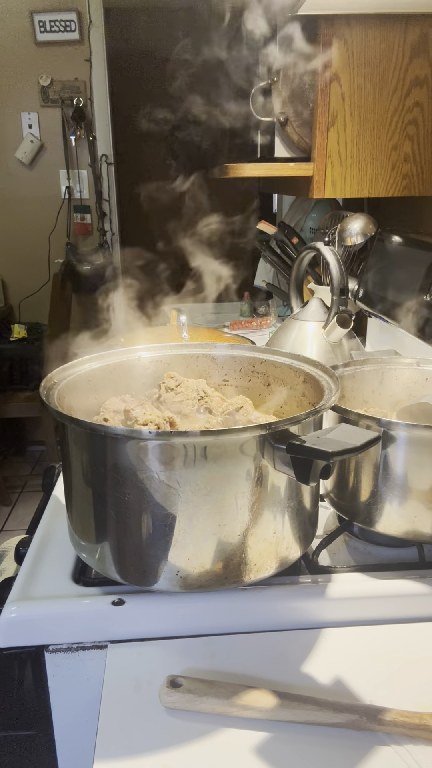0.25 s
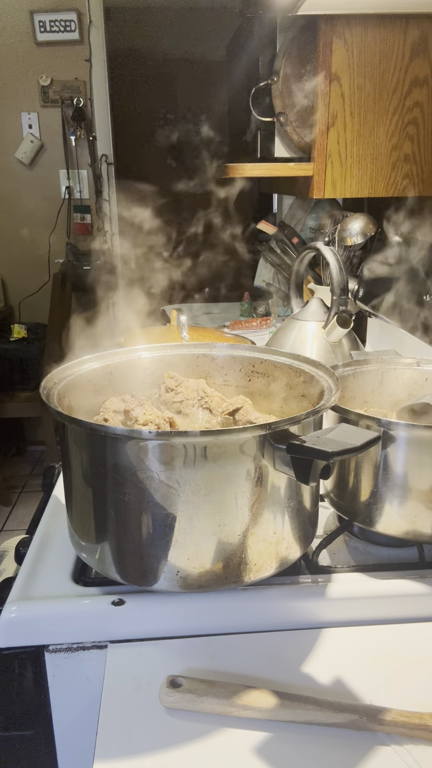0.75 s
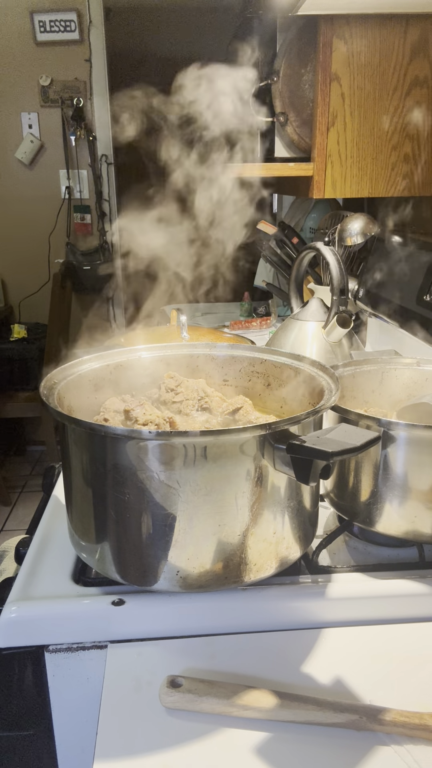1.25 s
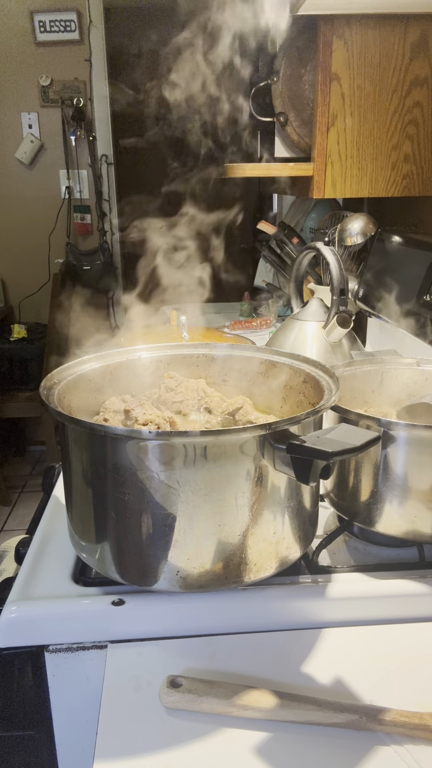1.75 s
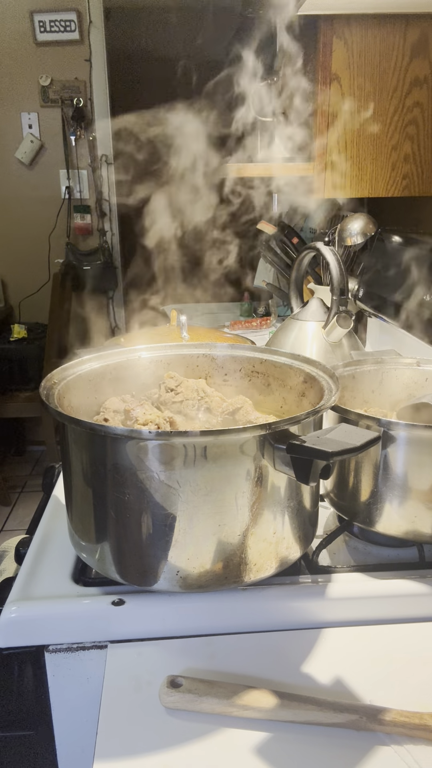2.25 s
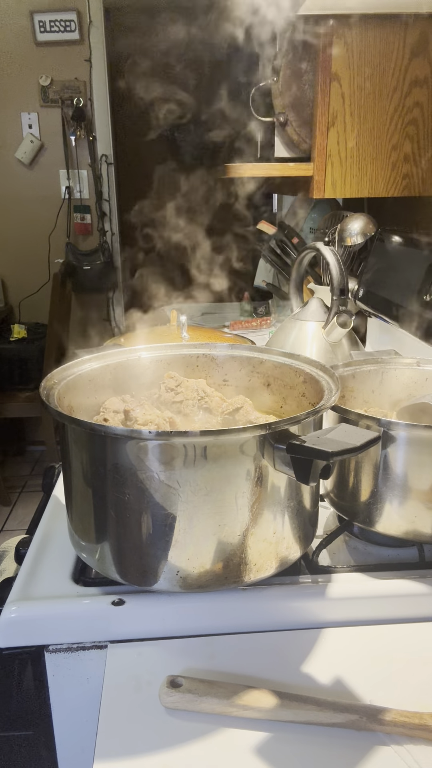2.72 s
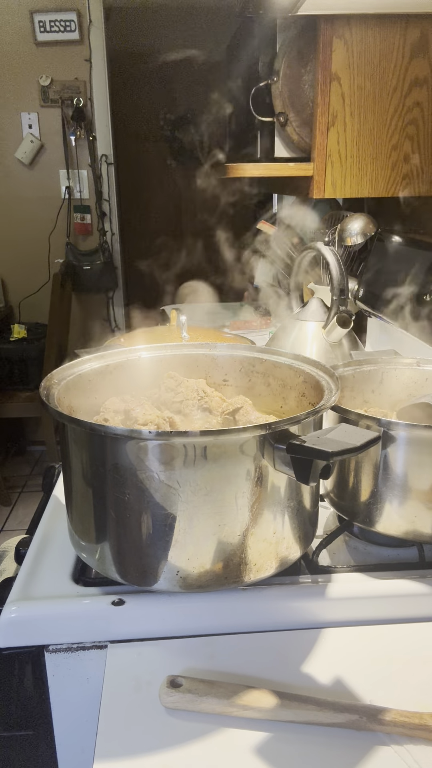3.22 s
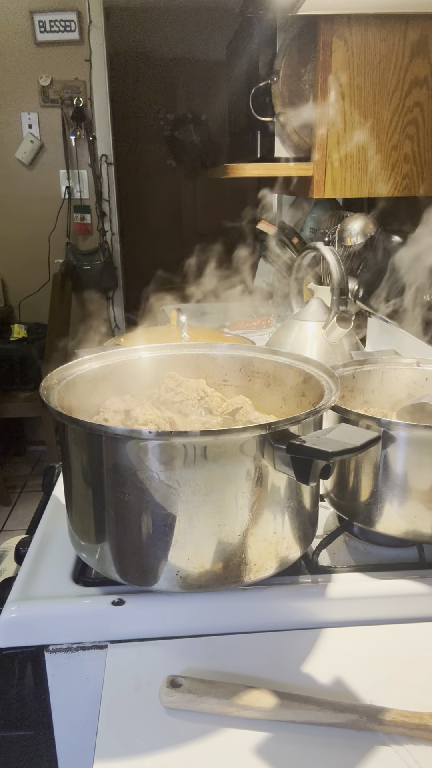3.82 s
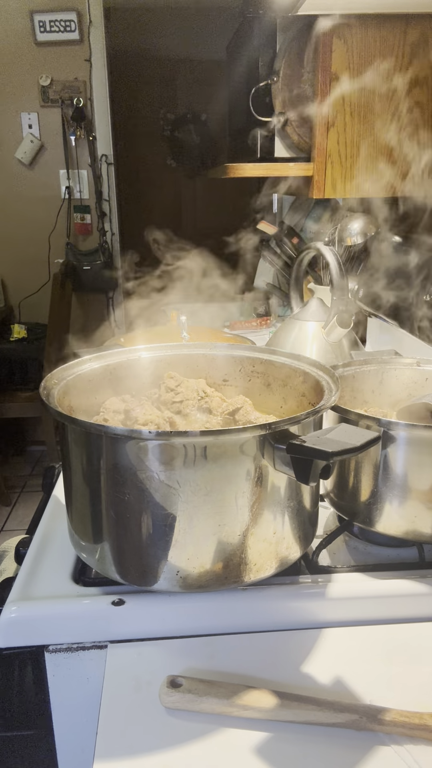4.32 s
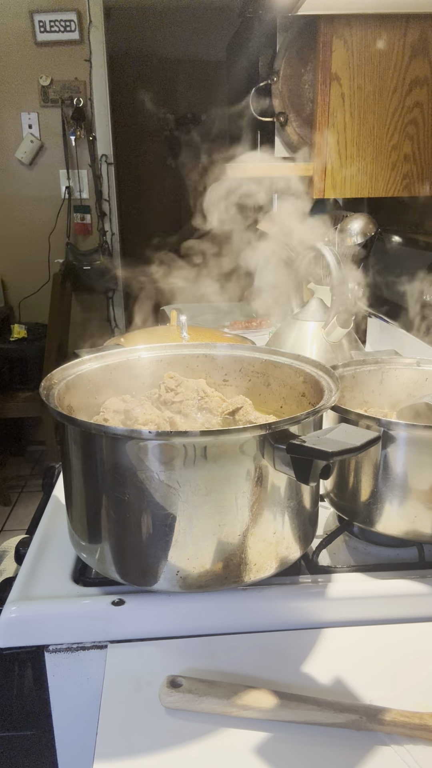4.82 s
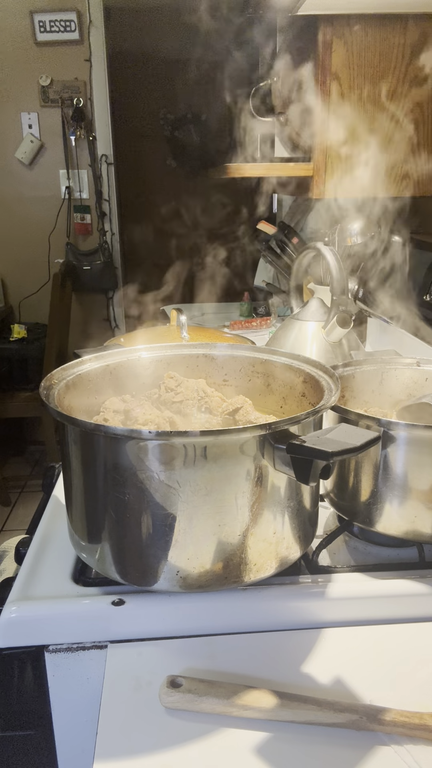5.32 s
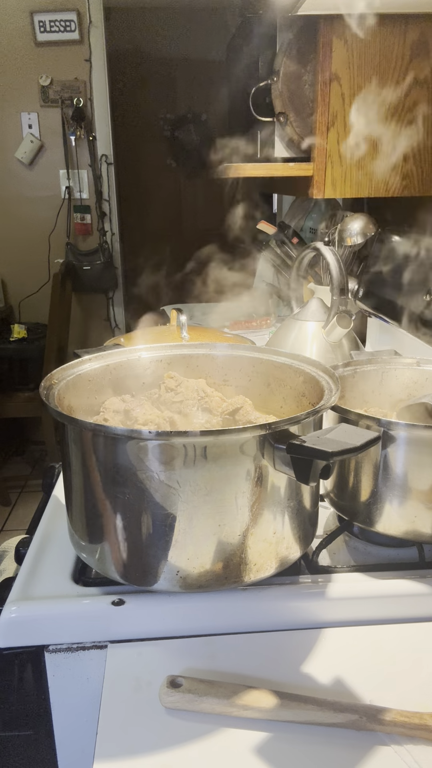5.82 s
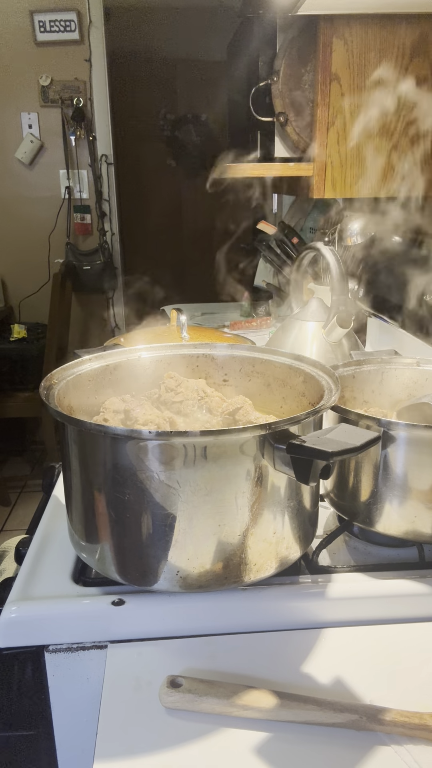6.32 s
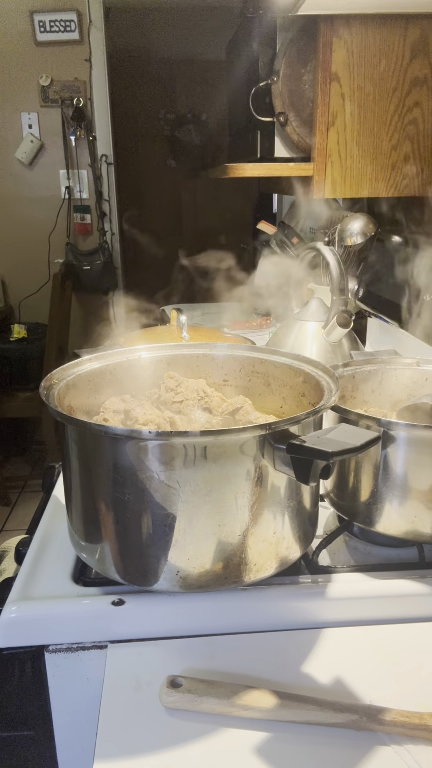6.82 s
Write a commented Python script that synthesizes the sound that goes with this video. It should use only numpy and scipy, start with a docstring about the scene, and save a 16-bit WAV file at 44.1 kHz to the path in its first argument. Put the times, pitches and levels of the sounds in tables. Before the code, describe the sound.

Steady gurgling boil in metal pots with soft hiss and hum; someone shuffles, knocks wood once, then makes two dull thuds near the end.

```python
"""Steam bubbles gurgle, spit and knock on the walls of large steel pots boiling on a home gas stove.
Knocks are struck wall modes, bubbles are short rising tones, and spits are brief puffs of noise.
Under them lie burner roar and hiss (drifting noise) and an appliance hum (steady sines).
Someone nearby shuffles (rubbing noise), knocks wood once and makes two dull thuds among fainter ones
(struck modes). Two close microphone ports share the direct sound and differ in the diffuse sound."""
import sys
import numpy as np
from scipy import signal
from scipy.fft import rfft, irfft
from scipy.io import wavfile
from scipy.ndimage import uniform_filter1d

SR = 44100
rng = np.random.default_rng(int(sys.argv[2]) if len(sys.argv) > 2 else 0)


def dump(signal):
    """Clip the signal to [-1, 1] and save it as 16-bit WAV at the path in sys.argv[1]."""
    limited = np.clip(np.atleast_2d(signal).T, -1, 1)
    pcm = np.round(limited * 32767).astype(np.int16)
    wavfile.write(sys.argv[1], SR, pcm)


N = 311346  # length in samples

# Modes of the steel pot wall. Each row: frequency in Hz, relative level in dB, 60 dB decay time in s.
POT_MODES = [(581, 3.5, 0.027), (653, 1, 0.017), (780, -4, 0.03), (1010, 0, 0.02), (1120, -1.5, 0.018),
             (1370, -2, 0.017), (1800, -3.5, 0.018), (2050, -3.5, 0.02), (2374, -12, 0.02),
             (2555, -8, 0.021)]
# Loudest bubble collapses against the wall. Each row: start in s, level in dB, favoured pitch in Hz.
POT_KNOCKS = [(0.064, -42, 1020), (0.184, -42, 1500), (0.196, -38, 800), (0.451, -46, 1020),
              (0.548, -41, 1010), (0.686, -42.5, 945), (0.91, -39, 650), (1.031, -44, 1050),
              (1.33, -40.5, 650), (1.348, -39, 1860), (1.431, -44, 990), (1.445, -41.5, 1100),
              (1.459, -44, 1790), (1.512, -43, 2410), (1.612, -44.5, 1200), (1.69, -40, 705),
              (1.741, -45, 650), (1.757, -40, 2080), (1.767, -39.5, 1350), (1.809, -46, 1030),
              (1.826, -40, 1800), (1.991, -38, 1070), (2.03, -51, 2000), (2.076, -43, 620),
              (2.106, -45, 1360), (2.28, -47, 1360), (2.345, -42.5, 1340), (2.379, -44, 1010),
              (2.444, -40.5, 980), (2.526, -40.5, 2500), (2.659, -44.5, 990), (2.76, -45.5, 1330),
              (2.946, -44, 1000), (2.967, -41, 1340), (3.143, -39.5, 1320), (3.25, -41, 890),
              (3.365, -36, 1100), (3.399, -41.5, 1790), (3.415, -44, 2300), (3.535, -35.5, 1170),
              (3.572, -50, 1030), (3.762, -46, 1400), (3.844, -43, 2100), (4.048, -55, 1050),
              (4.136, -42.5, 1370), (4.349, -46, 1030), (4.384, -40, 970), (4.419, -41, 1050),
              (4.622, -41.5, 810), (4.71, -41.5, 1010), (5.024, -34.5, 1200), (5.17, -43.5, 1000),
              (5.268, -33.5, 1390), (5.523, -45, 1130), (5.549, -43, 780), (5.578, -44, 1130),
              (5.738, -43, 1120), (6.537, -43, 780), (6.631, -41, 762), (6.995, -32, 770),
              (7.028, -37, 780)]
# Strength of the boil about its usual level. Each row: time in s, strength in dB.
BOIL_STRENGTH = [(0.0, -2.5), (0.15, 2), (0.3, 1.5), (3.5, 2), (6.07, 2.2), (6.29, -7), (6.6, 7)]
# Dry wide ticks. Each row: start in s, level in dB.
LOUD_TICKS = [(0.3616, -47), (0.767, -39), (0.909, -37), (4.6165, -36), (5.5488, -55), (5.6346, -35),
              (5.994, -32), (6.1925, -36), (6.2283, -22.5), (6.316, -34.5), (6.6833, -26), (6.8578, -40),
              (7.0125, -34)]
# Thuds, each a quick roll of blows. Each row: start in s, roll length in s, level in dB,
# 60 dB decay time of the clatter in s, brightness in dB per octave, boom level in dB.
THUD_ROLLS = [(6.229, .023, -19, 0.075, 1, -14.5), (6.271, 0.04, -32.5, 0.19, 0, -34),
              (6.677, 0.032, -22, 0.07, -2, -27), (6.684, .02, -29, 0.072, 15, -50),
              (6.725, .045, -32, 0.067, 0, -32), (6.828, 0.0078, -41.5, 0.06, 0.5, -50),
              (6.912, .03, -42, 0.35, 9, -45), (6.994, .035, -43, 0.1, 7.5, -47.5)]
# Modes that the thuds ring. Each row: frequency in Hz, relative level in dB, 60 dB decay time in s.
BOARD_MODES = [(141, -1.5, 0.052), (256, -2, 0.073), (321, -0.5, 0.092), (385, -4, 0.057),
               (486, -7.5, 0.031), (562, -5, 0.025), (668, -2.5, 0.044), (772, -2.5, 0.025),
               (903, -7.5, 0.029), (1073, -4, 0.023), (1200, 0.5, 0.014), (1790, -15.5, 0.049),
               (1960, -18.5, 0.041), (2224, -23, 0.021)]
# The wooden knock. One row: start in s, level in dB, rattle share 0-1, 60 dB rattle decay time in s.
WOOD_KNOCK = (4.854, -15.5, 0.02, 0.32)
# Modes of the piece of wood. Each row: frequency in Hz, relative level in dB, 60 dB decay time in s.
WOOD_MODES = [(301, -5.5, 0.052), (381, -4.5, 0.084), (425, -6.5, 0.13), (550, -0.5, 0.044),
              (650, 8, 0.041), (770, -1, 0.024), (963, -1, 0.032), (1180, -0.5, 0.024), (1647, 2.5, 0.013),
              (2140, -4.5, 0.018), (2500, -8, 0.02)]
# Shuffling strokes. Each row: peak in s, swell in s, hold in s, fade in s, scratch level in dB,
# body level relative to the scratch in dB, airy top relative to the scratch in dB, squeak in Hz.
STROKES = [(0.365, 0.024, 0.034, 0.14, -52.5, 7.5, -5, 3050),
           (4.738, 0.15, .01, 0.061, -64.5, 10.5, -21, 4400),
           (4.835, 0.14, 0.017, 0.15, -50.5, 6, -3, 4600), (5.549, 0.0081, .005, 0.15, -59, 7, -1, 3920),
           (6.194, 0.05, 0.011, 0.041, -60, -6, 12, 3600), (6.231, 0.013, 0.01, 0.1, -48, 15, 1.5, 3450),
           (6.33, 0.35, 0.042, 0.15, -60, 7, 0.5, 3700), (6.688, 0.052, 0.024, 0.14, -49, 12.5, 0.5, 3900),
           (6.83, 0.14, .02, 0.12, -63.5, 9, 9, 4100), (6.915, 0.1, 0.024, 0.21, -56.5, 8, 5, 3600),
           (7.0, 0.1, 0.056, 0.33, -62, 6.5, 8, 4020)]
# Spectra of rubbing: scratch, duller body, airy top. Each row: frequency in Hz, relative level in dB.
SCRATCH_SPECTRUM = [(2400, -23), (3300, 3.5), (4000, -3), (4900, 1.5), (6200, 1), (9000, -15), (12000, -41)]
BODY_SPECTRUM = [(300, 1), (600, 6), (1100, -0.5), (1550, -6.5), (2050, 4), (2400, 0.5), (2700, -1.5),
                 (3300, -11), (5000, -39)]
AIR_SPECTRUM = [(6000, -43), (9000, 0.5), (13000, 8.5), (16000, 2)]
# Squeak band of a stroke. One row: level relative to the scratch in dB, width in Hz.
SQUEAK_BAND = (-3, 1200)
# Burner roar with the kitchen's low resonances. Each row: frequency in Hz, level in dB per Hz.
ROAR_SPECTRUM = [(18, -105), (50, -71.5), (100, -69), (140, -72), (182, -90), (230, -79), (400, -77),
                 (510, -86), (640, -85.5), (800, -90.5), (1500, -97), (2050, -95.5), (2300, -97.5),
                 (2750, -96.5), (3100, -105), (6000, -115)]
# Burner hiss through the microphone's treble peak. Each row: frequency in Hz, level in dB per Hz.
HISS_SPECTRUM = [(1500, -113), (3500, -104), (6200, -102.5), (8000, -105), (9700, -107.5), (10800, -104.5),
                 (12200, -98.5), (15800, -101.5)]
# Appliance hum: motor, its slower beat partner, mains buzz. Each row: frequency in Hz, rms level in dB.
HUM_TONES = [(59.17, -46.5), (55.85, -58.5), (119.99, -51.5)]
# Weak bass of the microphone and a dead spot of the room, for sounds near the stove.
# Each row: frequency in Hz, gain in dB.
BASS_RESPONSE = [(20, -50), (75, -1), (150, 1.5), (185, -8), (230, 0.5)]
# The pair of ports. Each row: frequency in Hz, share of power arriving directly 0-1,
# left minus right level in dB.
PORT_PAIR = [(110, .9996, 0), (150, .993, 0), (220, .96, .8), (400, .93, -.5), (700, .45, -1.5),
             (1300, .5, -2.5), (2000, .68, -1.5), (3000, .35, .3), (4700, .3, .8), (6200, .55, 1),
             (7300, .99, 0), (9200, .99, 0), (10200, .75, 0), (12600, .98, 0), (13700, .98, 0),
             (15800, .8, 0)]
# The ports turn out of step in the treble. Each row: frequency in Hz, lead of the right port in radians.
PORT_LEAD = [(0, 0), (4000, .15), (5500, 1.5), (7300, 3.1), (9200, 3.2), (10200, 4.3), (12600, 6.2),
             (13700, 6.35), (15800, 7.9)]

SPOT_DETUNE, BLOW_DETUNE = 0.03, 0.043  # spread of mode pitch, as a share, from contact to contact
KNOCK_CONTACT_S, KNOCK_FLURRY_S = .0032, 0.0061
KNOCK_NARROW_DB, KNOCK_WIDE_DB = 26, 14  # loss per octave off the favoured pitch, and the largest loss
PATTER_DB, PATTER_PER_S, PATTER_SPREAD_DB = -60.5, 450, 3.5
PATTER_LOW_HZ, PATTER_HIGH_HZ = 573, 2700
CHURN_DB, CHURN_S = 4, .03  # depth and smoothing time of the clumps of small bubbles
BLOWS = 4  # blows in a roll
ROLL_ARCH_DB, ROLL_FADE_DB = 6.5, -2.5  # rise at mid-roll, change from first blow to last
ROLL_DRAG = 1.1  # the gaps between blows widen by this power
ROLL_DULLING_DB = -6  # change of tilt per octave, from the first blow of a roll to the last
BOOM_HZ, BOOM_S = 115.5, 0.011
STROKE_RANGE_DB = 30  # rise over the swell and fall over the fade
LUMPS_DB = 3.5  # slower catches that roughen the body of a stroke
EDGE_HZ = 15800


def gain_of(db):
    """Level law: decibels to amplitude."""
    return 10 ** (np.asarray(db) / 20)


def evened(x):
    """Normalisation to unit rms."""
    return x / np.sqrt(np.mean(x ** 2) + 1e-20)


def read(points, hz, index=1):
    """Interpolation of a table column on a logarithmic frequency axis."""
    points = np.transpose(points)
    return np.interp(np.log(hz + 1), np.log(points[0] + 1), points[index])


def coloured(x, points):
    """Linear filtering: each frequency is scaled by a (Hz, dB) spectrum."""
    size = x.shape[-1]
    return irfft(rfft(x) * gain_of(read(points, np.fft.rfftfreq(size, 1 / SR))), size)


def add(mix, s, sound):
    """Superposition of a sound on the mix, from a time in seconds."""
    part = mix[round(s * SR):][:len(sound)]
    part += sound[:len(part)]


def unequal_hits(per_s, spread_db, limit):
    """Poisson-like arrivals: sparse single-sample hits of very unequal, bounded sizes."""
    size = gain_of(spread_db * np.minimum(rng.exponential(1, N), limit))
    return size * (rng.random(N) < per_s / SR)


def strayed(modes, share, luck):
    """Dependence on the contact: the same modes, each a little off its pitch."""
    return [(hz * (1 + share * r), db, t60) for (hz, db, t60), r in zip(modes, luck)]


def ring(modes, contact_s, extra_db=0., size=8000):
    """Modal response to a soft pulse, peak 1: decaying sines, neighbouring modes swinging oppositely."""
    t = np.arange(size) / SR
    hz, db, t60 = np.transpose(modes)[:, :, None]
    sign = (-1.) ** np.arange(len(modes))[:, None]
    level = sign * gain_of(db + extra_db - 60 * t / t60)
    x = (level * np.sin(2 * np.pi * hz * t)).sum(0)
    x = x * (1 - np.exp(-t / contact_s))  # the contact softens the onset
    return x / abs(x).max()


def resonate(x, hz, width_hz):
    """Band resonance by heterodyning: shifts the curve hz down to zero, smooths, and shifts back."""
    turn = np.exp(2j * np.pi * np.cumsum(hz) / SR)
    r = np.exp(-np.pi * width_hz / SR)
    smooth = signal.lfilter([1 - r], [1, -r], x / turn)
    smooth = signal.lfilter([1 - r], [1, -r], smooth)
    return evened((turn * smooth).real)


def pot_knocks():
    """Modal excitation: collapsing bubbles ring the wall in flurries that favour modes near their pitch."""
    out, hz, t = np.zeros(N), np.array(POT_MODES)[:, :1], np.arange(700) / SR
    lucks = rng.standard_normal((len(POT_KNOCKS), len(t) + len(POT_MODES)))
    for (s, db, pitch_hz), luck in zip(POT_KNOCKS, lucks):
        where_db = 1.2 * luck[len(t):, None]  # every spot on the wall drives the modes differently
        loss_db = np.minimum(KNOCK_NARROW_DB * abs(np.log2(hz / pitch_hz)), KNOCK_WIDE_DB)
        flurry = (t == 0) + 0.14 * luck[:len(t)] * np.exp(-t / KNOCK_FLURRY_S)
        modes = strayed(POT_MODES, SPOT_DETUNE, luck[:len(t):7])
        wall = ring(modes, KNOCK_CONTACT_S, where_db - loss_db, size=3000)
        knock = signal.oaconvolve(flurry, wall)
        add(out, s, gain_of(db) * knock / abs(knock).max())
    return out


def pot_patter(churn):
    """Modal excitation by many small collapses, each on one of 24 spots with its own favoured pitch."""
    hz = np.array(POT_MODES)[:, :1]
    small = unequal_hits(PATTER_PER_S, PATTER_SPREAD_DB, 4)
    spots = np.geomspace(PATTER_LOW_HZ, PATTER_HIGH_HZ, 24)
    which, luck = rng.integers(0, len(spots), N), rng.standard_normal((len(spots), len(POT_MODES)))
    patter = np.zeros(N)
    for k, pitch_hz in enumerate(spots):
        modes = strayed(POT_MODES, SPOT_DETUNE, luck[k])
        wall = ring(modes, 0.00083, -12 * abs(np.log2(hz / pitch_hz)), size=3000)
        patter += signal.oaconvolve(small * (which == k), wall)[:N]
    return gain_of(PATTER_DB) * evened(patter * churn)


def grains(per_s, low_hz, high_hz, cycles, glide, spread_db, count=24):
    """Bubble resonance: short rising tones, each pitch with its own sparse train of unequal sizes."""
    boil = gain_of(np.interp(np.arange(N) / SR, *np.transpose(BOIL_STRENGTH)))
    size = unequal_hits(per_s, spread_db, 5) * boil
    which, out = rng.integers(0, count, N), np.zeros(N)
    for k, hz in enumerate(np.geomspace(low_hz, high_hz, count)):
        u = np.arange(int(3 * cycles * SR / hz)) * hz / SR / cycles
        envelope = (1 - np.exp(-8 * u)) * np.exp(-2.5 * u)
        bubble = envelope * np.sin(2 * np.pi * cycles * (u + glide * u ** 2))
        out += signal.oaconvolve(size * (which == k), bubble)[:N]
    return evened(out)


def broth(churn):
    """Bubble resonance at the surface: big gurgles lie low, smaller bubbles reach higher."""
    gurgle = gain_of(-63) * grains(180, 298, 780, 1.56, 0.053, 1.8)
    bubbles = gain_of(-65) * grains(400, 605, 2880, 4.5, 0.1, 3.4)
    return (gurgle + bubbles) * churn


def ticks():
    """Impulsive noise: brief wide puffs, the loud ones and a faint spitting from the pot rims."""
    out, t = np.zeros(N), np.arange(400) / SR
    for (s, db), noise in zip(LOUD_TICKS, rng.standard_normal((len(LOUD_TICKS), 400))):
        add(out, s, gain_of(db - 60 * t / 0.02) * noise)
    spits = gain_of(-52.0) * unequal_hits(35, 4.17, 4)
    decay = np.exp(-1 / (0.00063 * SR))
    out += signal.lfilter([1], [1, -decay], spits) * rng.standard_normal(N)
    return coloured(out, [(800, -0.5), (3000, -3.5), (9000, -11.0), (13000, -5)])  # (Hz, dB)


def thuds():
    """Modal excitation: each blow of a roll and the clatter that follows it ring the boards."""
    out, t, hz = np.zeros(N), np.arange(SR // 4) / SR, np.array(BOARD_MODES)[:, :1]
    luck = rng.standard_normal((len(THUD_ROLLS), BLOWS, len(t)))
    for (s, roll_s, db, t60, tilt_db, boom_db), noises in zip(THUD_ROLLS, luck):
        # the floor gives way once at the end of each roll
        swell = np.exp(-((t - roll_s) / BOOM_S) ** 2) * np.minimum(t / roll_s, 1)
        add(out, s, gain_of(boom_db) * swell * np.sin(2 * np.pi * BOOM_HZ * t))
        for u, noise in zip(np.linspace(0, 1, BLOWS), noises):
            tilt = (tilt_db + ROLL_DULLING_DB * (u - .5)) * np.log2(hz / 300)
            boards = ring(strayed(BOARD_MODES, BLOW_DETUNE, noise[::-1]), 0.00058, tilt)
            drive = (t == 0) + 0.1 * noise * gain_of(-60 * t / t60)
            blow = signal.oaconvolve(drive, boards) / np.linalg.norm(drive)
            blow_db = db + ROLL_ARCH_DB * np.sin(np.pi * u) + ROLL_FADE_DB * u
            add(out, s + u ** ROLL_DRAG * roll_s, gain_of(blow_db) * blow)
    return out


def wood_knock():
    """Modal excitation: one blow rings the wood, and a decaying noise drive lets it rattle on."""
    out, t = np.zeros(N), np.arange(SR // 4) / SR
    s, db, share, t60 = WOOD_KNOCK
    drive = (t == 0) + share * rng.standard_normal(len(t)) * gain_of(-60 * t / t60)
    add(out, s, gain_of(db) * signal.oaconvolve(drive, ring(WOOD_MODES, 0.0016)))
    return out


def shuffles():
    """Friction noise: grainy scratch, body, airy top and squeak, as each stroke swells, holds and fades."""
    grit = gain_of(2.5 * evened(uniform_filter1d(rng.standard_normal(N), 150)))
    noise = rng.standard_normal((4, N)) * grit
    scratch = evened(coloured(noise[0], SCRATCH_SPECTRUM))
    body = evened(coloured(noise[1], BODY_SPECTRUM))
    air = evened(coloured(noise[2], AIR_SPECTRUM))
    lumps = evened(uniform_filter1d(rng.standard_normal(N), 600))
    body = evened(body * gain_of(LUMPS_DB * lumps))
    squeak_db, squeak_width_hz = SQUEAK_BAND
    out = np.zeros(N)
    for peak_s, swell_s, hold_s, fade_s, level_db, body_db, air_db, squeak_hz in STROKES:
        end = min(round((peak_s + hold_s + fade_s) * SR), N)
        at = np.arange(round((peak_s - swell_s) * SR), end)
        t = at / SR - peak_s
        away = np.maximum(np.maximum(-t / swell_s, (t - hold_s) / fade_s), 0)
        stroke = gain_of(level_db - STROKE_RANGE_DB * away)
        squeak = resonate(noise[3, at], np.full(len(at), squeak_hz), squeak_width_hz)
        rub = scratch[at] + gain_of(body_db) * body[at] + gain_of(air_db) * air[at]
        out[at] += stroke * (rub + gain_of(squeak_db) * squeak)
    return out


def burner():
    """Turbulent noise: direct, left-diffuse and right-diffuse fields with shared patches and flutter."""
    frames, hz = N // 256 + 5, np.fft.rfftfreq(1024, 1 / SR)
    z = rng.standard_normal((frames, 513, 7)).T
    patches = evened(uniform_filter1d(uniform_filter1d(z[6], 14, 0), 12, 1))
    flutter = evened(uniform_filter1d(rng.standard_normal(frames), 5))
    boil = np.interp(np.arange(frames) * 256 / SR, *np.transpose(BOIL_STRENGTH))
    # the flame's hiss flutters as one, its roar drifts in patches
    treble = np.clip(hz / 3000, 0, 1)[:, None]
    patch_depth = 1.4 * (1.5 - 1.45 * treble) * np.clip(hz / 350, .3, 1)[:, None]
    field = gain_of(patch_depth * patches + 1.7 * flutter * treble + .5 * boil)
    spectra = (z[:3] + 1j * z[3:6]) * field
    white = evened(signal.istft(spectra, nperseg=1024, noverlap=768)[1][:, :N])
    # unit rms spread over SR / 2, so the spectra read as dB per Hz
    return (coloured(white, ROAR_SPECTRUM) + coloured(white, HISS_SPECTRUM)) * np.sqrt(SR / 2)


def hum():
    """Beating of steady tones: the close pair beats about three times a second."""
    t, out = np.arange(N) / SR, np.zeros(N)
    for hz, db in HUM_TONES:
        out += np.sqrt(2) * gain_of(db) * np.sin(2 * np.pi * (hz * t + rng.random()))
    return out


def kitchen(x, t60s):
    """Diffuse reverberation: spectra of x through two unrelated even tails of sparse taps; t60s is (Hz, s)."""
    taps = np.zeros((2, SR // 2))
    at = np.arange(60, SR // 2 - 20, 20) + rng.integers(0, 20, (2, (SR // 2 - 61) // 20))
    np.put_along_axis(taps, at, rng.choice([-1., 1.], at.shape), 1)
    hz, t, z = signal.stft(taps, SR, nperseg=256)
    decayed = z * gain_of(-60 * t / read(t60s, hz)[:, None])
    tail = rfft(signal.istft(decayed, SR, nperseg=256)[1], N)
    return rfft(x) * tail / np.sqrt(uniform_filter1d(abs(tail) ** 2, size=300))


def scene():
    """Coherence of two ports: direct sound is shared but for phase and lean, diffuse sound differs."""
    clumps = evened(uniform_filter1d(rng.standard_normal(N), int(CHURN_S * SR)))
    churn = evened(gain_of(CHURN_DB * clumps))  # small bubbles of every size come in clumps
    stove = coloured(pot_knocks() + pot_patter(churn) + broth(churn) + ticks(), BASS_RESPONSE)
    person = coloured(shuffles() + thuds() + wood_knock(), BASS_RESPONSE)
    flame = burner()
    hz = np.fft.rfftfreq(N, 1 / SR)
    share, side = read(PORT_PAIR, hz), np.array([[-.5], [.5]])  # left, right
    lean = gain_of(-side * read(PORT_PAIR, hz, index=2))  # for all but the person
    direct = lean * rfft(gain_of(-0.5) * stove + hum() + flame[0]) + gain_of(1.0) * rfft(person)
    # the pots stand close and scatter briefly; the person is heard through the whole room
    stove_tail = gain_of(1.5) * kitchen(stove, [(300, 0.02), (1500, 0.034)])
    room_t60s = [(300, 0.18), (700, 0.14), (1500, .11), (10000, 0.022)]
    person_tail = gain_of(0.3) * kitchen(person, room_t60s)
    diffuse = lean * (rfft(flame[1:]) + stove_tail) + person_tail
    turn = np.exp(1j * side * np.interp(hz, *np.transpose(PORT_LEAD)))
    return irfft(np.sqrt(share) * turn * direct + np.sqrt(1 - share) * diffuse, N)


def record(dry):
    """Band limitation: a steep linear-phase low-pass at the recorder's upper edge."""
    low_pass = signal.firwin(1023, EDGE_HZ, window=("kaiser", 9), fs=SR)
    return signal.oaconvolve(dry, low_pass[None], "same")


dry = scene()
out = record(dry)
dump(out)
```